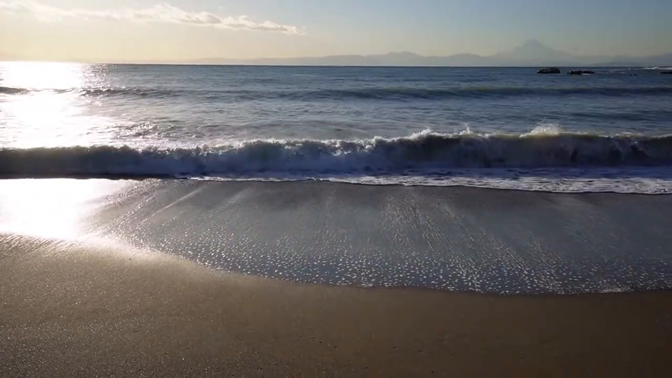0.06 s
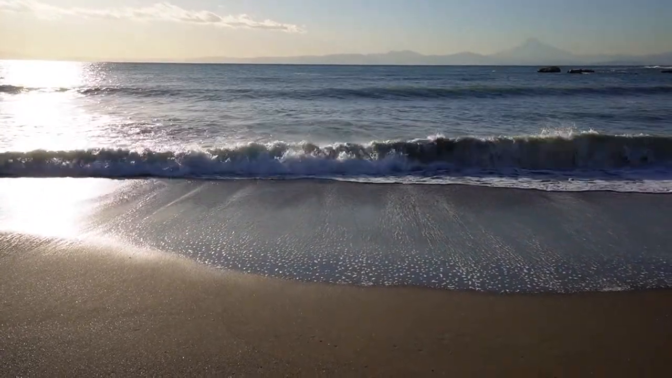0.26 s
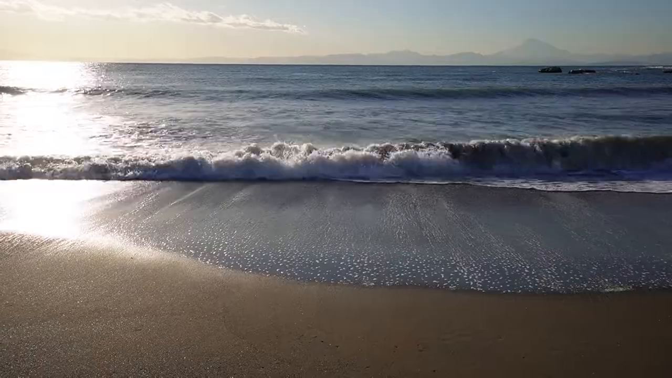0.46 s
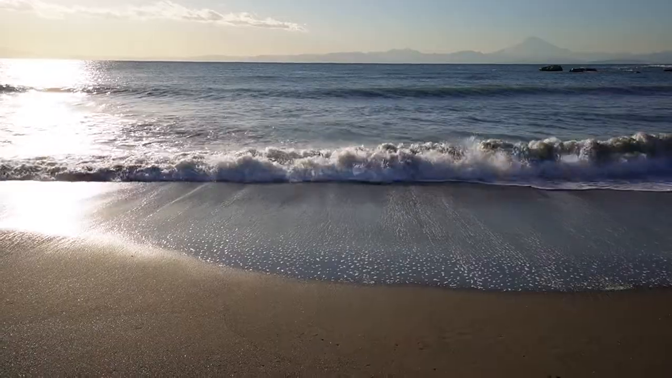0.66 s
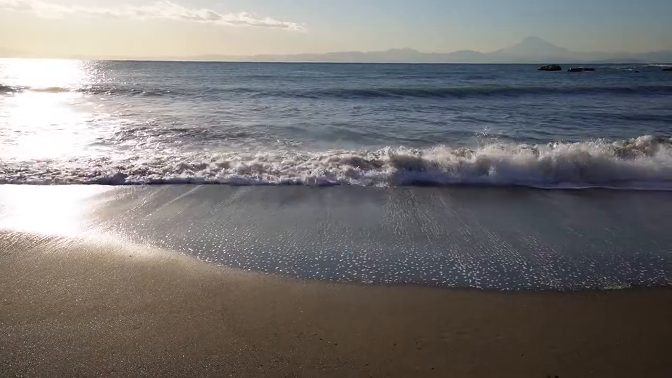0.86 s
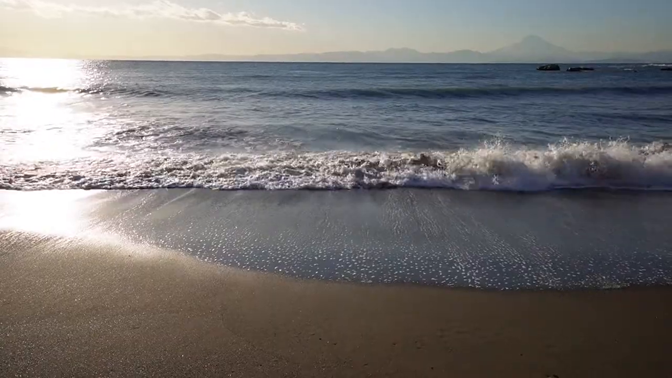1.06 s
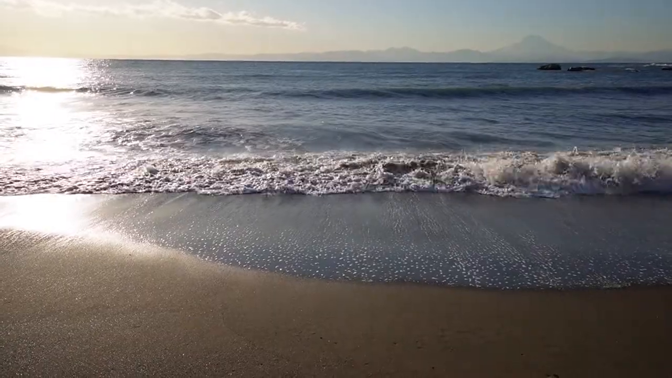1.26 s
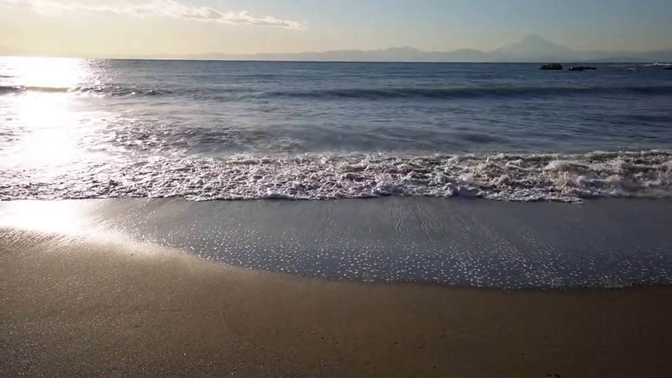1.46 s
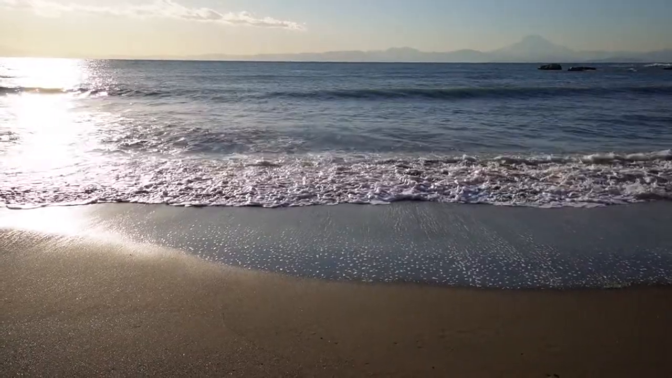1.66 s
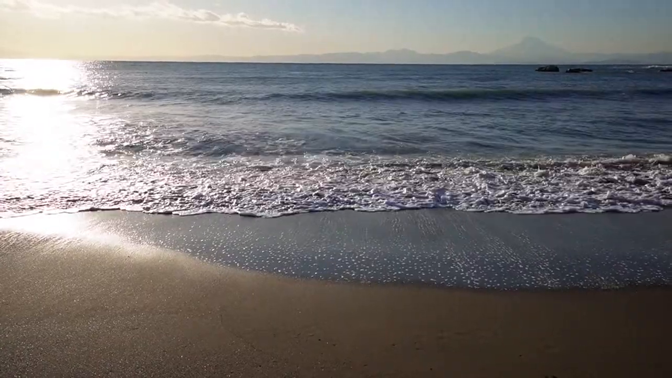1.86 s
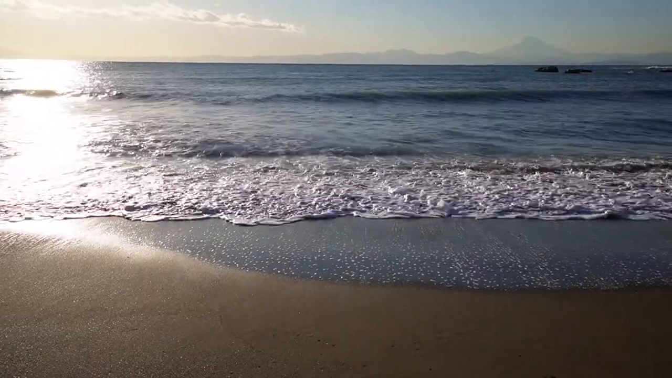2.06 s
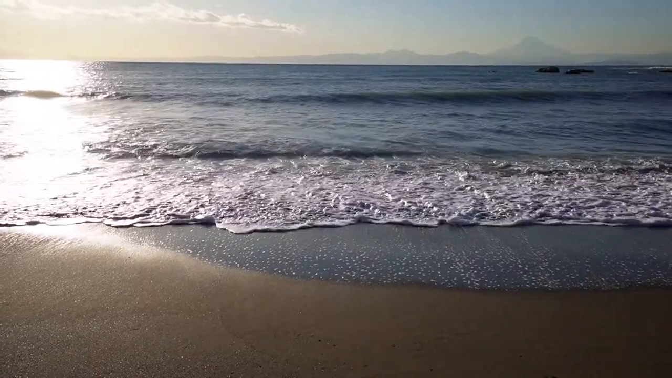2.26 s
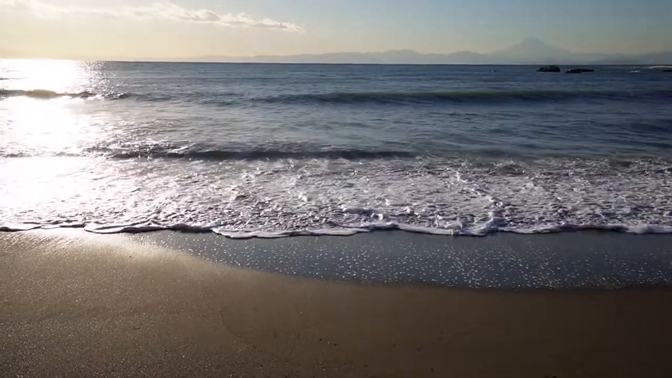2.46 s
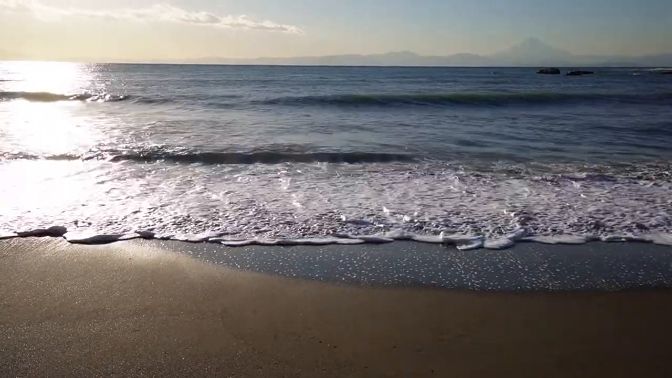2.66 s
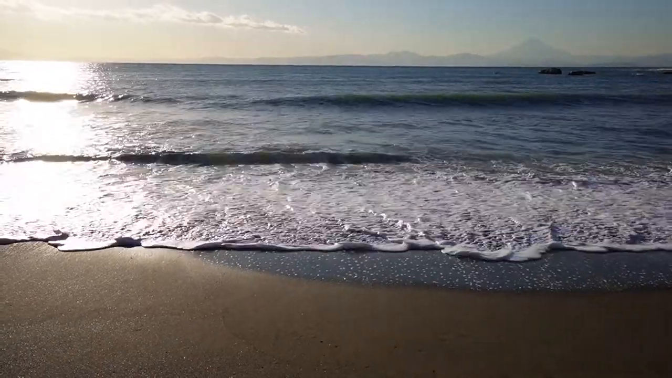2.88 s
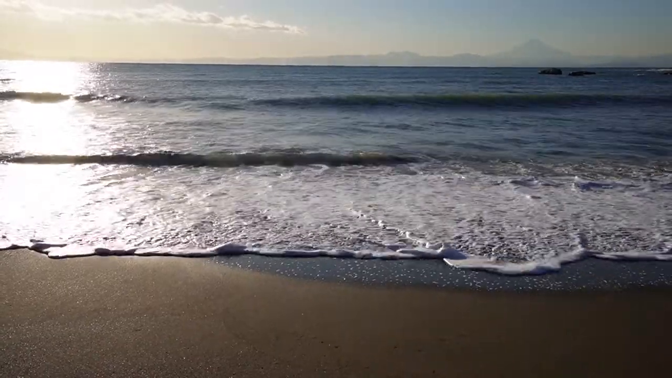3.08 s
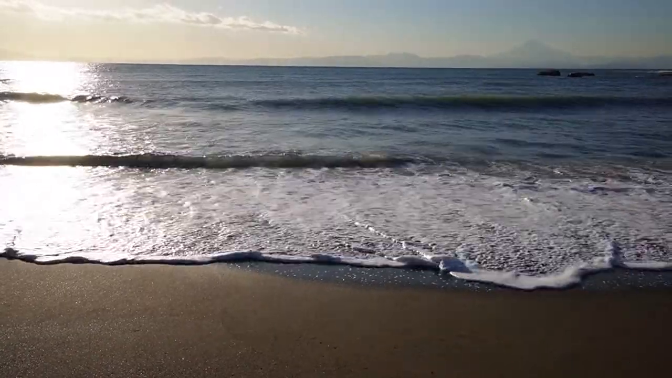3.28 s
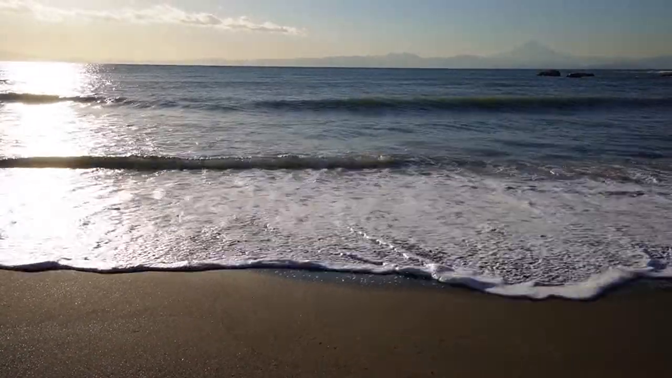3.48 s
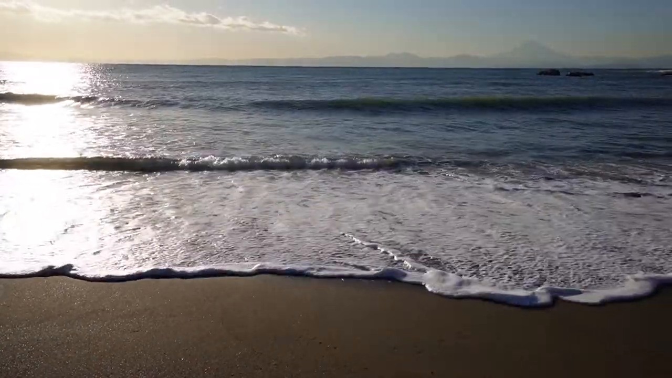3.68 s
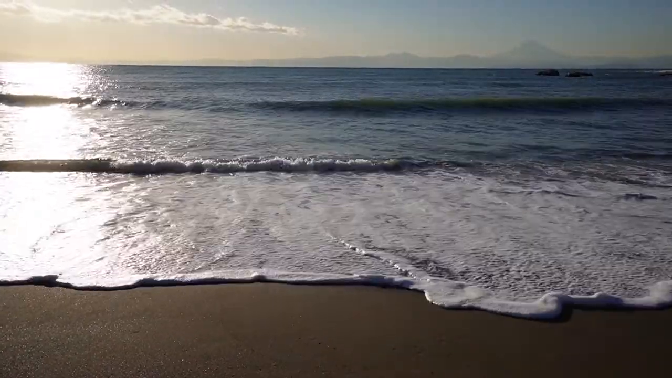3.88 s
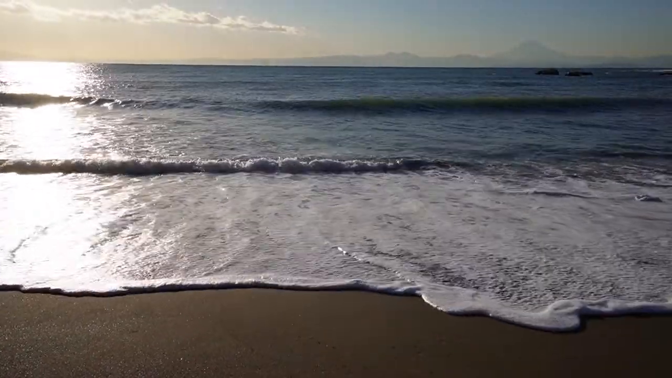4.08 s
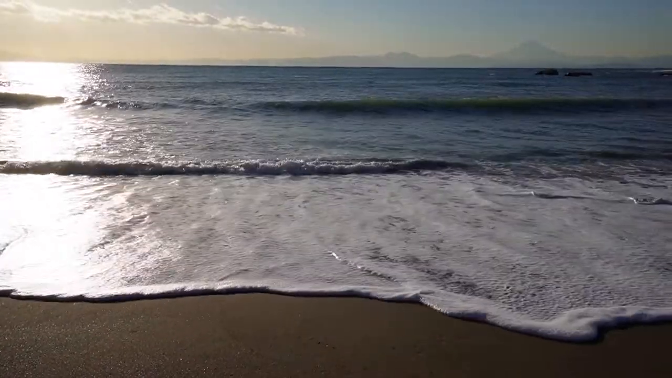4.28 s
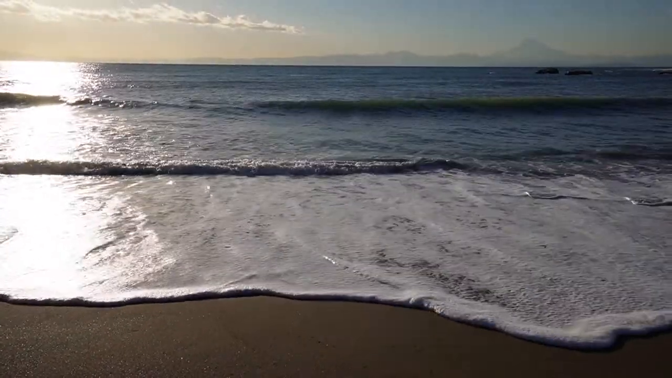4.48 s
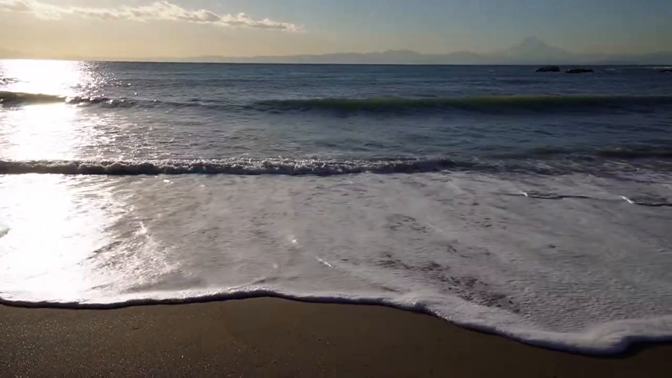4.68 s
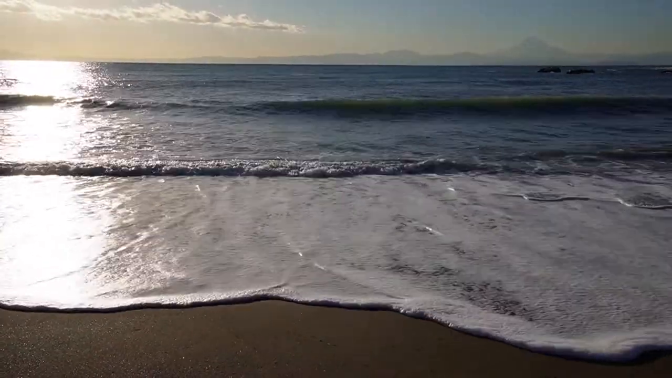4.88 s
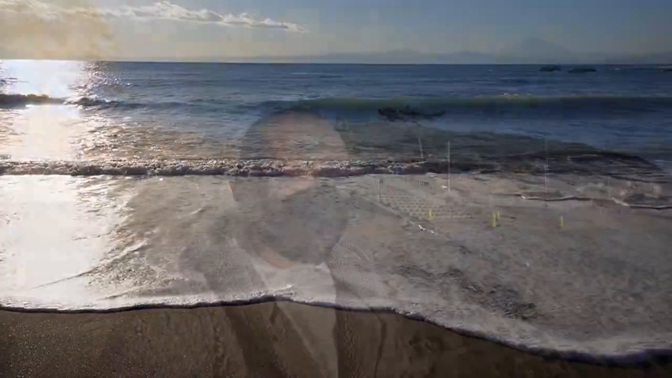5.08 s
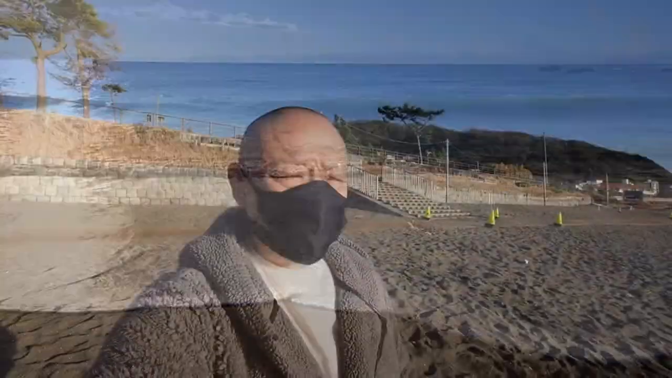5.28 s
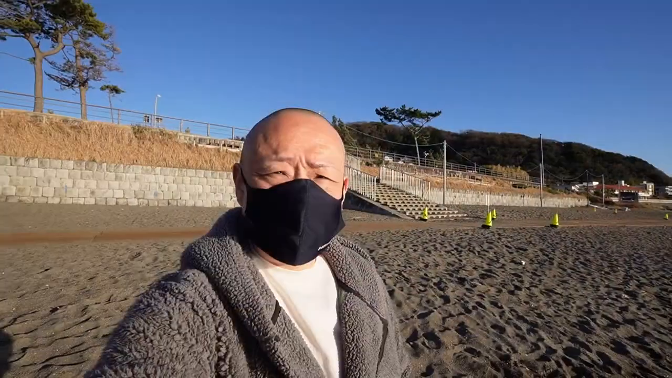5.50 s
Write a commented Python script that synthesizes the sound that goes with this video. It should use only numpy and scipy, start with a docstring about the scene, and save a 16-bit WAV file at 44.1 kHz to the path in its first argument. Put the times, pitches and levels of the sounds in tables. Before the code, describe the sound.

Outdoor sandy beach, stereo microphone close to the water and facing the sea, dry and open. From 0 s a large wave is breaking loudly: a broad, deep roar ahead, bright spray hiss, a low rumble of trapped air and heavy thuds at about 0.2 and 1.0 s. From roughly 0.8 s the crest plunges toward the right, strongest there around 1.5 s. After 1.4 s the roar falls away fast, and by about 2.3 s only a quiet, even hiss of foam running up the sand remains, with fine bubble pops, returning to the centre. A very faint, wavering low hum swells around 3 s. Small slaps of water come near 3.5 s. From 3.7 to 5.2 s a smaller, lighter, much quieter wave spills, with soft thumps near 4.2 and 4.45 s. It drops off, and after 5.4 s the foam hiss sinks into the sand over faint distant surf.

```python
"""Sandy beach, two closely spaced microphone ports facing the sea. A wave is breaking from the start:
falling water thuds, trapped air rumbles, the crest roars, and it plunges last on the right.
Then a hissing wash of foam with bursting bubbles, and a faint low hum that swells in the lull.
Near the end a smaller, lighter wave spills, and at the very last the foam sinks into the sand.
Shaped noise makes the water, damped tones the bubbles; distant surf and a thin hiss lie under it all."""
import sys
import numpy as np
from scipy import signal
from scipy.fft import rfft, irfft, next_fast_len
from scipy.io import wavfile
from scipy.ndimage import uniform_filter1d, minimum_filter1d, map_coordinates

SR = 44100
rng = np.random.default_rng(int(sys.argv[2]) if len(sys.argv) > 2 else 0)


def bounce(signal):
    """Save signal as a 16-bit WAV file at the path given by the first command-line argument."""
    frames = np.transpose(np.atleast_2d(signal))
    limited = np.clip(frames, -1, 1)
    pcm = np.round(limited * 32767).astype(np.int16)
    wavfile.write(sys.argv[1], SR, pcm)


N = 244314

# The big wave, then the small one; each layer adds its own small trim to these levels:
# [fully breaking t/s, spent t/s, rise dB/s, fall dB/s, then level/dB of thud, rumble, roar, hiss, fizz]
WAVE_LEVELS = [(0.107, 1.444, 28, 22.5, -34.5, -19, -15, -20, -30),
               (3.84, 5.25, 26, 45, -51, -32, -26.5, -32, -44.5)]
# How fast each part dies away, fizz soonest: [thud, rumble, roar, hiss, fizz; multiples of the wave's fall]
SETTLING_PACE = (0.8, 1, .98, 0.97, 1.2)


def breakers(lag_s=0):
    """Level in dB of thud, rumble, roar, hiss and fizz as each wave builds, holds and dies away."""
    t = np.arange(N) / SR - lag_s
    waves_db = []
    for full_s, spent_s, rise, fall, *held_db in WAVE_LEVELS:
        building_db = rise * np.maximum(full_s - t, 0)
        dying_db = fall * np.outer(SETTLING_PACE, np.maximum(t - spent_s, 0))
        waves_db.append(np.array(held_db)[:, None] - building_db - dying_db)
    big_db, small_db = waves_db
    return together(big_db, small_db)


# Share of the white water's power coming from the plunge on the right: [t/s, share 0-1]
RIGHTWARD_SHARE = [(0, 0), (.7, 0.05), (1.0, 0.68), (1.45, 0.96), (1.9, 0.82), (2.5, 0.28), (3.3, 0.18),
                   (3.8, 0.08), (5.5, 0.01)]
# Tongues of water slapping over the foam:
# [t/s, bell width/s, roar swell level/dB, hiss swell level/dB, fizz swell level/dB]
SPLASH_SWELLS = [(.18, 0.017, 1.4, 1.5, -1), (.52, .12, .7, 0.6, .9), (1.468, .015, -2, 2.2, 2.5),
                 (3.478, 0.012, -0.5, 3, 1), (3.565, 0.041, 2, 3, 0), (3.96, 0.31, 0.3, 0.1, 2.6),
                 (4.355, 0.022, 2.2, 1, 1), (5.245, 0.055, -0.5, 3, 0.5)]
SOAK_S, SOAK_DB_PER_S = 5.37, 33  # the foam starts to sink into the sand; fall of its hiss and fizz
PLUNGE_ROAR_DB = -5  # a crest that has fallen over roars less


def white_water(wash_roar_db, wash_hiss_db, wash_fizz_db):
    """Crest and spray of the waves over the wash of foam, changed by each splash."""
    rightward, = curves(RIGHTWARD_SHARE)
    _, _, roar_db, hiss_db, fizz_db = breakers()
    splash_roar_db, splash_hiss_db, splash_fizz_db = swells(SPLASH_SWELLS)
    soaked_db = SOAK_DB_PER_S * np.maximum(np.arange(N) / SR - SOAK_S, 0)
    roar_db = together(roar_db + PLUNGE_ROAR_DB * rightward, wash_roar_db) + splash_roar_db
    hiss_db = together(hiss_db, wash_hiss_db - soaked_db) + splash_hiss_db
    fizz_db = together(fizz_db, wash_fizz_db - soaked_db) + splash_fizz_db
    return crest(roar_db, rightward) + spray(hiss_db, fizz_db, rightward)


# Colour of the big wave's deep roar: [f/Hz, level/dB per Hz]
BIG_CREST_COLOUR = [(210, -41), (350, -1), (475, -6.5), (610, -4), (802, -3.5), (884, -2.5), (1460, -8),
                    (1620, -6), (2400, -10), (3120, -41), (5280, -120)]
# Colour of the small wave's lighter roar: [f/Hz, level/dB per Hz]
SMALL_CREST_COLOUR = [(210, -24), (350, 4), (499, 2.5), (752, 5), (950, 4), (1300, 4.5), (1720, 2.5),
                      (1990, -3.5), (2400, -4), (3120, -38), (5280, -120)]
# Colour of the plunge on the right: [f/Hz, level/dB per Hz]
PLUNGE_COLOUR = [(150, -31), (250, 16), (324, -13.5), (507, -7), (768, -8), (1480, -9), (1760, -8.5),
                 (1950, -10.5), (2800, -11.5), (3510, -12.5), (6310, -22), (13500, -41), (15500, -46)]
# The wide surf line ahead, at the two ports: [f/Hz, likeness -1 to 1, left lead/rad, left-right level/dB]
AHEAD_AT_PORTS = [(100, .999, .05, 0), (300, .991, .14, -.3), (580, .975, .34, -.9), (850, .958, .25, -.4),
                  (1700, .94, .19, -.4), (2700, .83, .25, -1), (4500, .87, .1, -.2), (8000, .74, .12, -.7),
                  (11000, .44, .3, -.9), (13000, -.28, 0, -.7), (15500, -.36, 0, -.3)]
# The compact plunge on the right, at the two ports: [f/Hz, likeness, left lead/rad, left-right level/dB]
RIGHT_AT_PORTS = [(100, .999, .05, 0), (300, .992, .14, -.7), (560, .98, .33, -2.2), (850, .962, .22, -1.8),
                  (1800, .97, 0, -2.6), (3000, .98, -.02, -4.2), (4500, .96, -.03, -2.3),
                  (8000, .85, -.25, -2.4), (12000, .52, -1, -.5), (15500, .45, -2.6, -.4)]


def crest(roar_db, rightward, change_s=1.88):
    """The tumbling crest roars densely: deep for the big wave, lighter for the small one."""
    big = heard(churn(patchy_db=.5), BIG_CREST_COLOUR, 370, 1810, AHEAD_AT_PORTS)
    small = heard(churn(patchy_db=0.47), SMALL_CREST_COLOUR, 360, 2290, AHEAD_AT_PORTS)
    plunge = heard(churn(patchy_db=1.26), PLUNGE_COLOUR, 426, 1860, RIGHT_AT_PORTS)
    # the lighter roar takes over within a second
    ahead = blend(big, small, np.arange(N) / SR - change_s)
    flutter_db = 0.075 * wobble(24.3)
    return amp(roar_db + flutter_db + 0.26) * blend(ahead, plunge, rightward)


def spray(hiss_db, fizz_db, rightward):
    """Spray hisses and foam fizzes higher up; both share one fast flutter."""
    hiss = amp(hiss_db + 0.23) * foam(1970, 5150, rightward, popping=0.071)
    fizz = amp(fizz_db + 2.0) * foam(5230, 19000, rightward, popping=0.23)
    flutter_db = 0.15 * wobble(16) + 0.19 * wobble(45)
    return (hiss + fizz) * amp(flutter_db)


# Colour of the spray and foam ahead: [f/Hz, level/dB per Hz]
SPRAY_COLOUR = [(650, -30), (1100, -23), (1450, -4.5), (1620, -1), (1830, -3.5), (1910, -6), (2580, -7.5),
                (4110, -11), (5920, -17), (10100, -27.5), (15500, -39)]


def foam(low_hz, high_hz, rightward, popping):
    """Countless tiny bubbles merge into a bed; at the foam's near edge single ones burst on top."""
    bursts = bubbles(per_second=3500, centre_hz=4990, cycles=1.4, spread_db=0.5)
    # popping is the bursts' share of the power before colouring
    edge_bubbles = blend(churn(patchy_db=0.9), bursts, popping)
    edge = heard(edge_bubbles, SPRAY_COLOUR, low_hz, high_hz, AHEAD_AT_PORTS)
    plunge = heard(churn(patchy_db=0.97), PLUNGE_COLOUR, low_hz, high_hz, RIGHT_AT_PORTS)
    return blend(edge, plunge, rightward)


def bubbles(per_second, centre_hz, cycles, spread_db):
    """Bursting bubbles: short damped tones of random pitch and strength, in two unrelated streams."""
    count = int(per_second * N / SR)
    when, kind, size, bearing = rng.random((count, 4)).T
    hz = np.clip(centre_hz * (kind / (1 - kind + 1e-9)) ** 0.31, 500, 14000)[:, None]
    age = hz * np.arange(64) / SR  # in cycles of the tone
    strength = amp(-spread_db * np.log(1 - .995 * size))[:, None]
    pops = strength * np.sin(2 * np.pi * age) * np.exp(-age / cycles)
    at = (when * N).astype(int)[:, None] + np.arange(age.shape[1])
    streams = []
    for way in (np.cos, np.sin):
        turned = pops * way(2 * np.pi * bearing)[:, None]
        streams.append(np.bincount(at.ravel(), turned.ravel(), N)[:N])
    return unit(np.array(streams))


# Lumps of water that fall heavily: [t/s, bell width/s, thud swell level/dB, rumble swell level/dB]
THUMP_SWELLS = [(.19, 0.027, 12, -2), (.5, 0.022, 2, 3.5), (.895, 0.015, -2, 5.5), (1.04, 0.023, 12, -3),
                (2.04, 0.089, -2, 2.2), (3.93, 0.12, 4, 2.6), (4.22, 0.056, 11, 1), (4.45, 0.078, 7, 4)]
# the big wave's plunge drives air under: middle, bell width, lift of thud and rumble
PLUNGE_S, PLUNGE_WIDTH_S, PLUNGE_THUD_DB, PLUNGE_RUMBLE_DB = 0.84, 0.2, 2.5, 2.5
CLOUD_LAG_S = 0.062  # trapped air rumbles on after the crest


def deep_water(wash_db):
    """The clouds follow the waves a little late and change with the plunge and each falling lump."""
    thud_db, rumble_db = breakers(CLOUD_LAG_S)[:2]
    thump_thud_db, thump_rumble_db = swells(THUMP_SWELLS)
    plunge = bell(PLUNGE_S, PLUNGE_WIDTH_S)
    rumble_db = together(rumble_db, wash_db) + PLUNGE_RUMBLE_DB * plunge + thump_rumble_db
    thud_db = thud_db + PLUNGE_THUD_DB * plunge + thump_thud_db
    return air_clouds(rumble_db, thud_db)


# Colour of the trapped air and falling water: [f/Hz, level/dB per Hz]
CLOUD_COLOUR = [(13, -56), (22, -32), (96, -7), (199, 1), (335, -2.5), (474, -7.5), (700, -12), (910, -36),
                (1540, -120)]


def air_clouds(rumble_db, thud_db):
    """The water's weight thuds down and the air it traps pulsates in large clouds."""
    thud = heard(churn(patchy_db=1.0), CLOUD_COLOUR, 28, 100.0, AHEAD_AT_PORTS)
    rumble = heard(churn(patchy_db=-0.48), CLOUD_COLOUR, 91.0, 441, AHEAD_AT_PORTS)
    pulsing_db = .3 * wobble(5.7)
    return amp(thud_db + 0.1) * thud + amp(rumble_db + pulsing_db - 0.23) * rumble


HUM_HZ = 128


def hum(level_db=-43, centre_s=3.0, width_s=0.87):
    """A faint low tone, wavering in phase and level, swells and fades between the waves."""
    phase = 2 * np.pi * HUM_HZ * np.arange(N) / SR + 0.81 * wobble(5)
    wavering = amp(level_db + 2.3 * wobble(4.34))
    return wavering * bell(centre_s, width_s) * np.sin(phase)


# Colour of the open sea's deep background: [f/Hz, level/dB per Hz]
SWELL_COLOUR = [(18, -20), (30, -17), (50, -5), (75, -6), (110, -4)]


def open_sea(level_db=-51):
    """Distant water: a deep rumble of patchy noise that stays between the waves."""
    return amp(level_db) * heard(churn(patchy_db=-2.0), SWELL_COLOUR, 18, 120, AHEAD_AT_PORTS)


def faint_hiss(level_db=-63):
    """A thin, even hiss under everything: white noise, unrelated at the two ports."""
    return amp(level_db) * rng.standard_normal((2, N))


def churn(patchy_db):
    """Two noises whose strength varies in patches of time and pitch, as bubble swarms come and go."""
    z = signal.stft(rng.standard_normal((2, N)), nperseg=512)[2]
    field = rng.standard_normal(z.shape[1:])
    field = uniform_filter1d(field, size=6, axis=0)  # along pitch
    field = uniform_filter1d(field, size=16, axis=1)  # along time
    patchy = z * amp(patchy_db * unit(field))
    return unit(signal.istft(patchy, nperseg=512)[1][:, :N])


def heard(pair, colour, low_hz, high_hz, place):
    """Colour two unrelated signals and mix them into the two ports by likeness and lead, at rms 1."""
    size = next_fast_len(N, real=True)
    hz = np.fft.rfftfreq(size, 1 / SR)
    alike, lead, balance_db = along(place, hz)
    mid, side = rfft(pair, size) * amp(along(colour, hz)[0]) * band(hz, low_hz, high_hz)
    apart = (1 - alike) / 2  # share of the power that the ports hear in opposite phase
    left = amp(balance_db / 2) * np.exp(.5j * lead)
    ports = np.array([blend(mid, side, apart) * left, blend(mid, -side, apart) / left])
    return unit(irfft(ports, size)[:, :N])


def amp(db):
    """Decibels to gain."""
    return 10 ** (np.asarray(db) / 20)


def unit(x):
    """Scale to rms 1."""
    return x / np.sqrt(np.mean(x ** 2) + 1e-20)


def along(points, hz):
    """Each column after the frequency, read on a log axis."""
    f, *cols = np.transpose(points)
    return [np.interp(np.log(hz + 1), np.log(f + 1), c) for c in cols]


def curves(rows):
    """One value per sample for each column after the time."""
    s, *cols = np.transpose(rows)
    return [np.interp(np.arange(N) / SR, s, c) for c in cols]


def wobble(rate):
    """A smooth random curve, rate knots a second."""
    knots = rng.standard_normal(int(N * rate / SR) + 4)
    return map_coordinates(knots, [np.arange(N) * rate / SR])


def bell(centre_s, width_s):
    """A smooth swell from 0 to 1 and back; the width is its standard deviation."""
    return np.exp(-((np.arange(N) / SR - centre_s) / width_s) ** 2 / 2)


def swells(rows):
    """The dB that a table of brief swells or dips adds, one curve for each of its dB columns."""
    return sum(np.outer(dbs, bell(s, width)) for s, width, *dbs in rows)


def together(a_db, b_db):
    """Level of two unrelated sounds heard at once: their powers add."""
    return 20 * np.log10(np.hypot(amp(a_db), amp(b_db)) + 1e-12)


def blend(a, b, share):
    """Cross-fade two unrelated sounds at even power."""
    share = np.clip(share, 0, 1)
    return np.sqrt(1 - share) * a + np.sqrt(share) * b


def band(hz, low_hz, high_hz, order=10):
    """Gain of a band whose edges join its neighbours at even power."""
    return ((1 + (low_hz / (hz + 1)) ** order) * (1 + (hz / high_hz) ** order)) ** -.5


def filtered(x, response):
    """Multiply the spectrum of x by a response of frequency."""
    size = next_fast_len(N + SR // 2)
    return irfft(rfft(x, size) * response(np.fft.rfftfreq(size, 1 / SR)), size)[..., :N]


# The foam running up the sand, before each layer's trim: [rumble, roar, hiss, fizz level/dB]
WASH_LEVELS = (-37.5, -37, -34, -42)


def scene():
    """All parts of the surf at the two ports, from the breaking waves to the background."""
    wash_rumble_db, *wash_foam_db = WASH_LEVELS
    waves = white_water(*wash_foam_db) + deep_water(wash_rumble_db)
    return waves + hum() + open_sea() + faint_hiss()


TOP_HZ = 15720  # the recorder's band limit


def record(dry):
    """The recorder limits the highest peaks and keeps nothing above its band limit."""
    needed = np.minimum(1, .88 / (np.abs(dry).max(axis=0) + 1e-9))
    gain = uniform_filter1d(minimum_filter1d(needed, size=200), size=200)
    return filtered(dry * gain, lambda hz: hz < TOP_HZ)


dry = scene()
out = record(dry)
bounce(out)
```